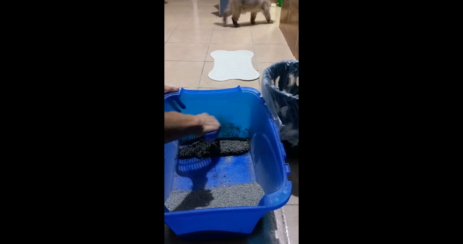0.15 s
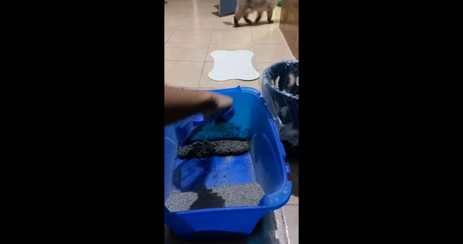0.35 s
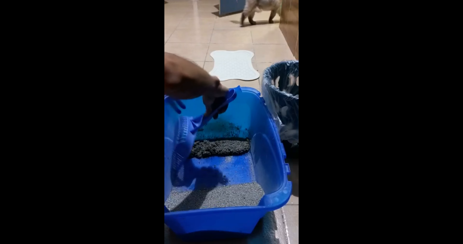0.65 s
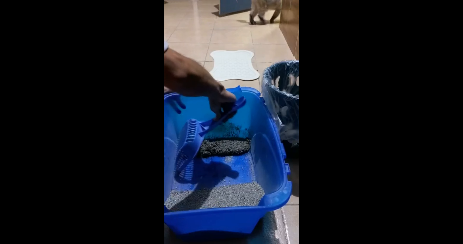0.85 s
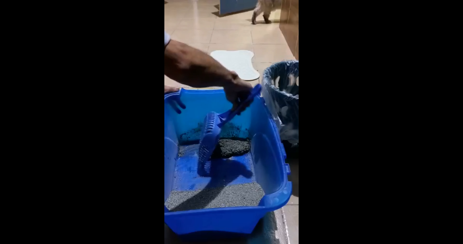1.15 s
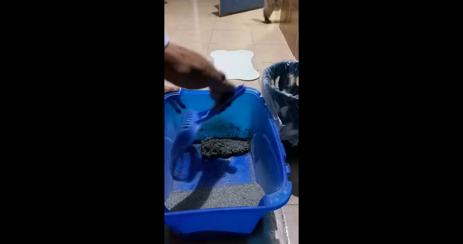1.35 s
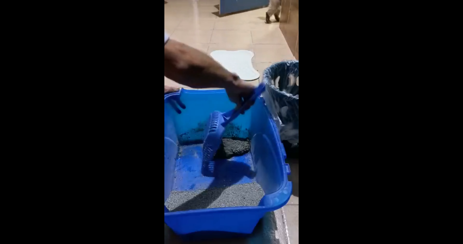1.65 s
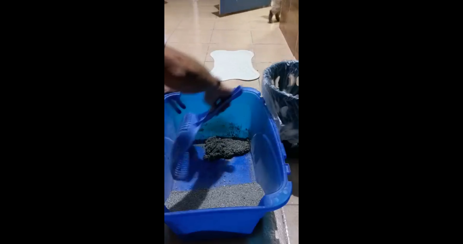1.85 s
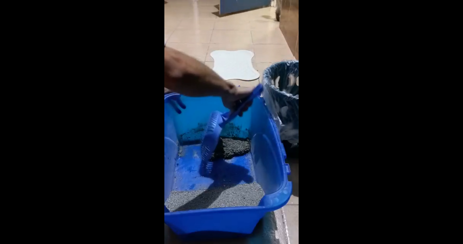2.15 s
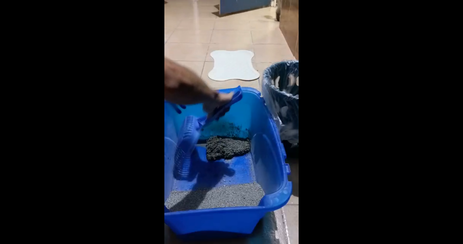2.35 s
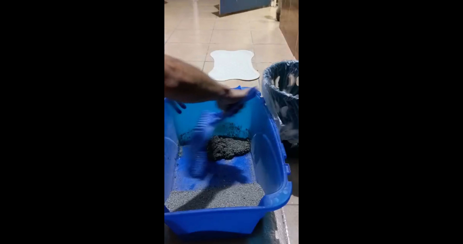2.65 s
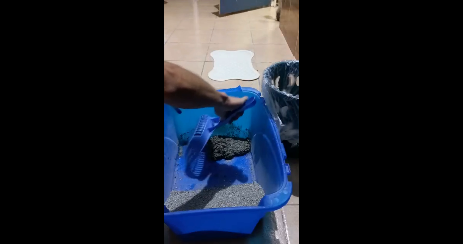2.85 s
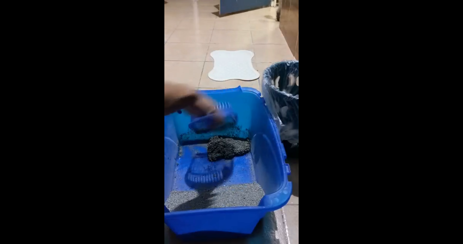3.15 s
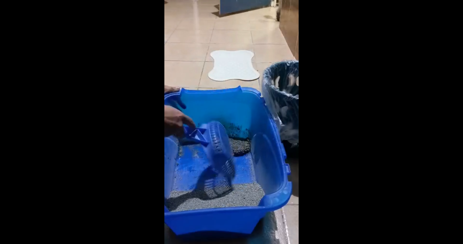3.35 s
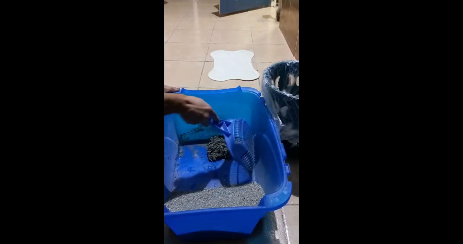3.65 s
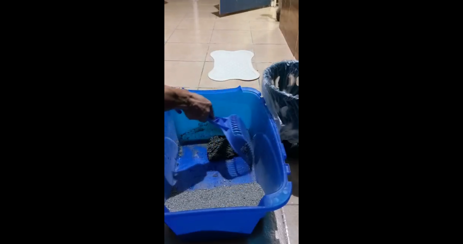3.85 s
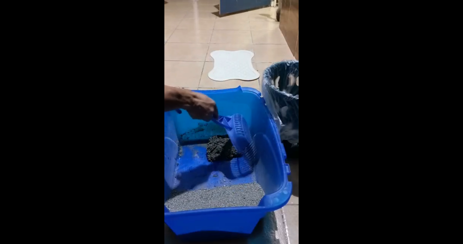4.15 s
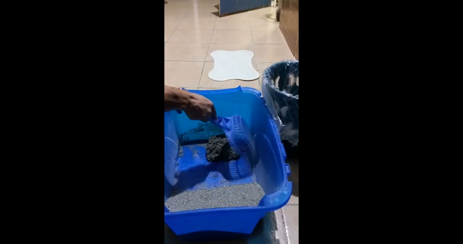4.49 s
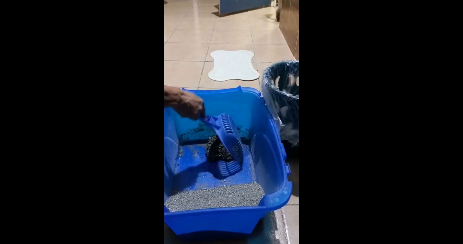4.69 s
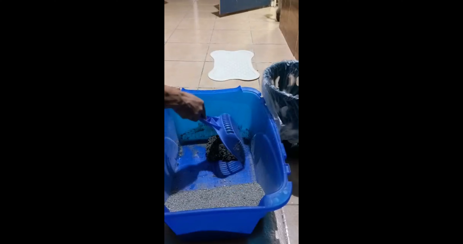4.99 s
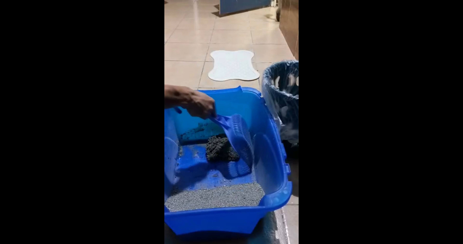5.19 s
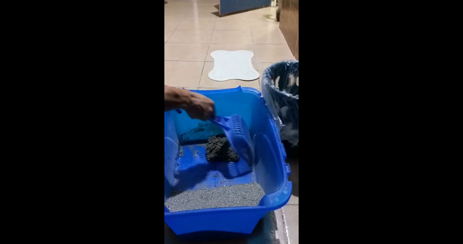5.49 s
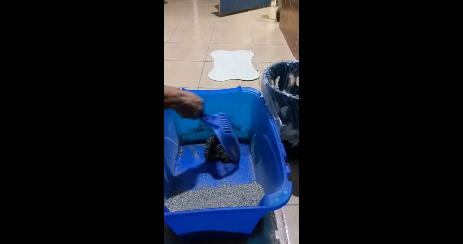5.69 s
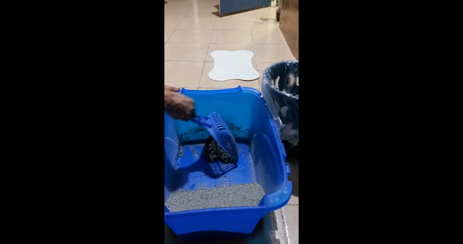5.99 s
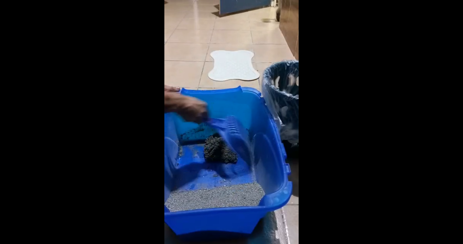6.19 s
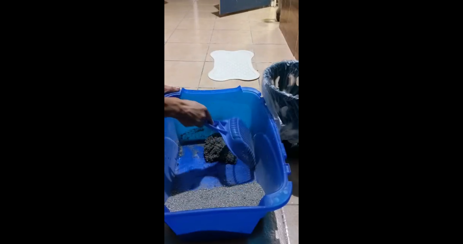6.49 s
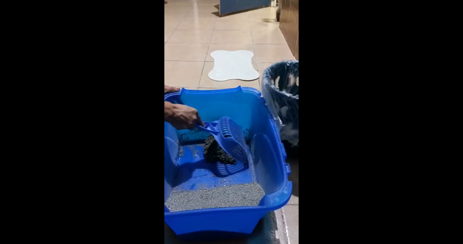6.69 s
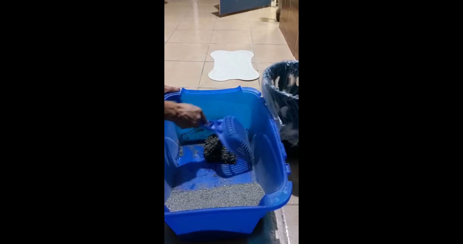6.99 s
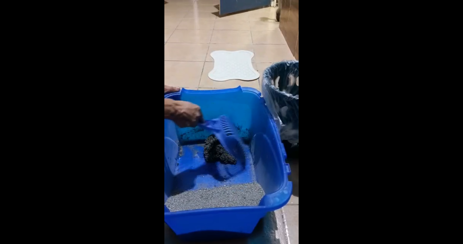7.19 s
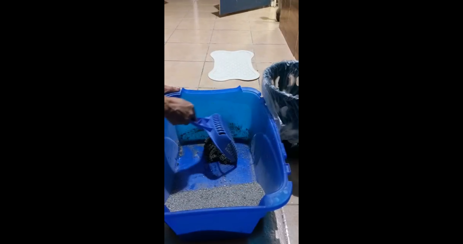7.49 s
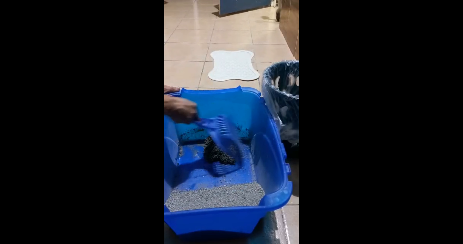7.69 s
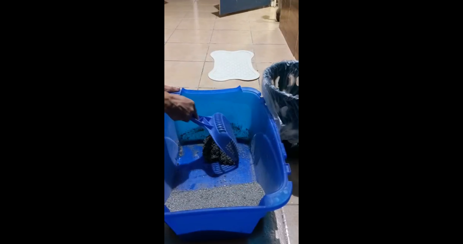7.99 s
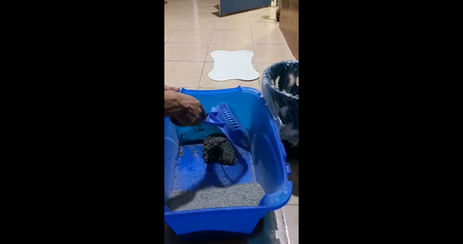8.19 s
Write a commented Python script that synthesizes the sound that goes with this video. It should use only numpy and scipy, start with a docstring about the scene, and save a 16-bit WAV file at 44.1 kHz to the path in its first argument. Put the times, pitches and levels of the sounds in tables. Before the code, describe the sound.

In a small tiled room with very faint air noise, a plastic slotted scoop moves damp gritty litter in a nearly empty plastic tub, heard close in stereo. Light knocks at 0.1 and 0.6 s lead to a slow, swelling scrape from 0.8 to 1.1. From about 1.4 to 2.9 come quick, vigorous crunching strokes, the grit at its loudest, with hiss, rasp and soft hollow taps. A lull follows, with a barely audible airy squeak near 3.5, then a firm double plastic knock at 3.6 and light dragging. From 4.1 to 8 s, strokes repeat roughly every third of a second: hollow thud, short gritty skid, swelling rasp, occasional sharp grain snaps, strongest near 4.8. The heaviest knock lands at 7.6, another at 7.9, then small scrapes fade out. Tub resonances are short and dull, with brief room echoes.

```python
"""Plastic scoop in gritty litter

A slotted scoop heaps damp, gritty litter in a nearly empty plastic tub, in a small tiled room: random grain
impacts crunch and hiss under the blade, landings and drags ring the tub's damped modes, cracks are
snaps with a spray of fragments. Filtered noise gives the room air and a faint, airy squeak."""
import sys
import numpy as np
from scipy import signal
from scipy.fft import rfft, irfft
from scipy.io import wavfile

SR = 44100
rng = np.random.default_rng(int(sys.argv[2]) if len(sys.argv) > 2 else 0)


def master(y):
    """Save y as 16-bit WAV."""
    cut = np.clip(np.atleast_2d(y).T, -1, 1)
    pcm = np.round(cut * 32767)  # scale
    wavfile.write(sys.argv[1], SR, pcm.astype(np.int16))


N = 367794
TIME = np.arange(N) / SR

# Still room air, relative spectrum: (frequency [Hz], level [dB])
AIR_SPECTRUM = [(30, -20), (75, -5.5), (160, -33.5), (360, -12.5), (480, -27), (900, -25.5), (1700, -39),
                (16000, -47)]
# Tub modes, undamped by the blade: (frequency [Hz], relative level [dB], t60 [s])
TUB_MODES = [(68.2, -9, 1), (82.8, -3.5, 0.21), (102.8, -1, 0.22), (199.8, -6.5, 0.24), (247.9, -5, 0.44),
             (265.3, -6, 0.33), (326.8, -2, 0.17), (367, 3, 0.26), (390.6, 0, 0.16), (505.8, 1.5, 0.16),
             (552.5, 0.5, 0.14), (600, -5, 0.32), (680.8, -6.5, 0.28), (760, -6, 0.14), (939, -4, 0.3),
             (1080, -5, 0.15), (1256, 1, 0.1), (1493, -4.5, 0.064)]
# Scoop lands on the tub: (time [s], relative knock level [dB], most excited frequency [Hz],
# relative floor flex [dB], relative hard contact [dB], relative crushed-grit level [dB])
LANDINGS = [(0.068, -39, 426, -7, 0, -57), (0.554, -41, 327, -25, -5, -58.5),
            (0.667, -46, 350, -20, -23, -71), (1.35, -46, 556, -8, -9, -57.5),
            (1.39, -43, 378, -9, -18, -60), (1.869, -42.5, 370, -9, -13, -62.5),
            (2.355, -42.5, 370, -17, -28, -62), (2.951, -45.5, 514, -4.5, 4.5, -62.5),
            (3.589, -34, 664, -9, -12, -66), (3.617, -36.5, 690, -29, -23, -78),
            (4.103, -54, 370, -10, -5, -58.5), (4.148, -44, 330, 5.5, -2, -58.5),
            (4.458, -39, 374, -1, -21, -51.5), (4.549, -44.5, 360, -0.5, 3, -65),
            (4.803, -39, 387, -2, -15, -52), (4.832, -40.5, 340, 1, -3.5, -52),
            (5.123, -42.5, 366, -9, -21, -58.5), (5.459, -40, 380, -0.5, -27, -51.5),
            (5.779, -41.5, 370, 3, -36, -51.5), (6.135, -56, 340, 9.5, 5, -58.5),
            (6.199, -40.5, 250, -4, -10, -60.5), (6.472, -45, 388, -12, -18, -56.5),
            (6.55, -49.5, 297, 1.5, -15, -65), (6.757, -42.5, 687, -21, 1.5, -85),
            (6.857, -40, 690, -6, 2, -55), (6.903, -43, 250, 2, -3, -57), (7.26, -55, 323, 16, -8, -55),
            (7.534, -51.5, 400, -18, -4, -66.5), (7.602, -31.5, 397, -9, -0.5, -50.5),
            (7.912, -38, 432, -25, -3.5, -54.5)]
# Grains crack under the edge: (time [s], relative level [dB], relative brightness [dB])
CRACKS = [(0.8032, -40.5, -19), (2.361, -31, -17), (2.817, -33.5, -15), (3.7635, -35.5, -19.5),
          (4.2471, -29.5, -23), (4.5513, -31, -18.5), (4.834, -25, -15), (5.1497, -32, -13.5),
          (5.789, -39.5, -1.5), (6.564, -36.5, -16), (7.033, -38, -22), (7.3265, -35, -19),
          (7.605, -27, -42), (7.968, -33, -19)]
# Blade drags through the litter: (start [s], rise [s], fall [s], relative grit level at the crest [dB],
# relative coarse rasp [dB], relative tub drumming [dB])
DRAGS = [(0, 0.0017, 0.053, -63, 2, -4), (0.63, 0.032, 0.043, -67.5, -6, 8),
         (0.801, 0.29, .055, -50.5, 3.5, -1.5), (1.234, 0.017, 0.043, -79, 11.5, 13),
         (1.449, 0.0072, 0.052, -56.5, -20, -4), (1.513, 0.06, 0.065, -43.5, 3.1, -13),
         (1.728, 0.062, 0.074, -47, 0, -8.5), (1.953, .02, 0.036, -55.5, -13, 0),
         (2.004, 0.057, 0.074, -42.5, 2.5, -3.5), (2.211, 0.025, 0.13, -48.5, 1, -1),
         (2.418, 0.073, 0.079, -42.5, 3, -4.5), (2.628, 0.0028, .11, -43.5, -5, -12.5),
         (2.787, 0.058, 0.06, -47.5, 4.5, -2.5), (3.62, 0.029, 0.13, -58.5, 1.5, 10),
         (3.828, 0.0067, 0.17, -59.5, -1.5, -2), (4.24, 0.0047, 0.098, -50.5, -1.5, -4),
         (4.58, 0.076, 0.042, -53, 1.5, -4), (4.898, 0.056, 0.073, -53, 0.5, -2.5),
         (5.206, 0.08, 0.056, -48, 1.5, -1), (5.538, 0.031, 0.069, -46, -4, -1.5),
         (5.86, 0.038, 0.076, -45.5, -1, -4), (6.2, 0.071, 0.044, -49.5, -2.5, -2),
         (6.641, 0.1, 0.055, -52.5, 1.5, -3), (7.028, 0.07, 0.069, -49.5, -3, -5.5),
         (7.325, 0.079, 0.058, -47.5, 2, 2), (7.65, 0.046, 0.086, -49.5, -1, 2),
         (8.04, 0.046, 0.026, -63.5, 5, 10), (8.17, 0.019, .2, -83.5, 0.5, -6)]
# Skid tone relative to its grit: (coarse rasp [dB], fine hiss [dB], tub drumming [dB])
SKID_TONE_DB = (-1.5, -2, 3.5)
# Crunching grit, relative spectrum: (frequency [Hz], level [dB])
GRIT_SPECTRUM = [(150, -15.5), (500, 1), (850, -3.5), (1350, 1), (2100, 0.5), (3800, -1), (5200, -3),
                 (6500, -7), (7600, -8), (8400, -14), (12000, -12.5), (16000, -16)]
# Grit stereo tilt before each port's share: (frequency [Hz], tilt toward the left [dB])
GRIT_TILT = [(1300, 4), (2200, -0.5), (4500, 2), (8000, -2.5), (15000, -2)]

AIR_DB = -73
WHINE_HZ, WHINE_T60_S = 1037, 0.03
WHINE_AT_S, WHINE_WIDTH_S, WHINE_DB = 3.47, 0.11, -74   # in the pause between two strokes
FLEX_HZ, WALL_HZ = 150, 750   # floor flexes below the first, stiff walls ring above the second
# A drag bites below its crest, swells as litter piles up, then eases and lifts
BITE_S, BITE_DB, SWELL_POWER, LIFT_DB, RELEASE_S = 0.00087, -10.5, 1.28, -9.5, 0.013
# The harder the push, the more fine hiss
MIDDLING_DB, HISS_DB_PER_DB = -46.5, 0.22
# After landing the blade presses in and skids to a stop; load is a share of a full one
SKID_RISE_S, SKID_S, SKID_TOUCH_DB, SKID_LOAD = 0.021, 0.064, -4, 0.95
LEFT_LAG_S = 0.00023
CUTOFF_HZ = 16000


def from_db(db):
    """Decibels to gain."""
    return 10 ** (np.asarray(db) / 20)


def rms_one(x):
    """Scale to rms 1."""
    return x / np.sqrt(np.mean(x ** 2) + 1e-20)


def cut(x, hz, kind, order=2):
    """Butterworth low- or high-pass."""
    sos = signal.butter(order, min(hz, 0.45 * SR), kind, fs=SR, output="sos")
    return signal.sosfilt(sos, x + 1e-18)


def band(x, low_hz, high_hz, low_order=3, high_order=3):
    """High-pass at low_hz, then low-pass at high_hz."""
    return cut(cut(x, low_hz, "high", low_order), high_hz, "low", high_order)


def colour(x, points, power=1):
    """Causal minimum-phase filter following a dB spectrum times power."""
    size = 4096
    hz, db = np.transpose(points)
    bins_hz = np.arange(size // 2 + 1) * SR / size
    bins_db = np.interp(np.log(bins_hz + 1), np.log(hz), db)
    cepstrum = irfft(power * np.log(from_db(bins_db)))[:size // 2]
    cepstrum[1:] *= 2   # fold to minimum phase
    impulse_response = irfft(np.exp(rfft(cepstrum, size)))
    return signal.fftconvolve(x, impulse_response)[:N]


def drift(knots_per_s):
    """Random wander: straight lines between normal knots of spread 1."""
    knots = rng.standard_normal(4000)
    return np.interp(TIME * knots_per_s, np.arange(len(knots)), knots)


def ring(force, hz, t60_s):
    """One damped mode driven by a force."""
    radius = np.exp(-np.log(1000) / (t60_s * SR))
    angle = 2 * np.pi * hz / SR
    poles = [1, -2 * radius * np.cos(angle), radius * radius]
    return signal.lfilter([0, np.sin(angle)], poles, force + 1e-18)


def grains(per_s, spread_db):
    """Random tiny impacts, many weak and a few strong, at rms 1."""
    sizes = from_db(spread_db * np.minimum(rng.exponential(1, N), 4))
    signs = rng.choice([-1, 1], N)
    hits = rng.random(N) < per_s / SR
    return rms_one(sizes * signs * hits / np.sqrt(per_s))


def brighten(x, db, corner_hz=7000):
    """Treble shelf: finer, sharper contacts."""
    dull = cut(x, corner_hz, "low", order=3)
    return dull + from_db(db) * cut(x, corner_hz, "high", order=3)


def reflections(t60_s, low_hz, high_hz):
    """Dense decaying echoes, different at each port; unit energy before the band filter."""
    t = TIME[:SR // 3]
    decay = np.exp(-np.log(1000) * t / t60_s) * (t > 0.001)
    echoes = rng.standard_normal((2, len(t))) * decay
    echoes /= np.sqrt(np.sum(echoes ** 2, axis=1, keepdims=True))
    return band(echoes, low_hz, high_hz, high_order=1)


def space(x, lag_s, walls_db, room_db, direct_db):
    """Direct sound reaches the right port first; tub walls and tiled room add their echoes."""
    direct = np.array([np.interp(TIME - lag_s, TIME, x), x])
    walls = from_db(walls_db) * reflections(0.039, 716, 15000)
    room = from_db(room_db) * reflections(0.43, 460, 8800)
    echoed = signal.oaconvolve(x[None], walls + room, axes=1)[:, :N]
    return from_db(direct_db) * direct + echoed


def after(start_s, length_s):
    """Samples of a movement plus a 0.3 s tail, and the time since it began."""
    span = slice(max(round(start_s * SR), 0), round((start_s + length_s + 0.3) * SR))
    return span, np.maximum(TIME[span] - start_s, 0)


def room_air(side_db=-6):
    """Still air: steady coloured noise, with a weaker part opposed between left and right."""
    mid, side = [rms_one(colour(rng.standard_normal(N), AIR_SPECTRUM)) for _ in range(2)]
    return from_db(AIR_DB) * (mid + from_db(side_db) * side * np.array([[1], [-1]]))


def squeak():
    """Faint, airy squeak: noise through two equal resonances, swelling and fading."""
    once = ring(rng.standard_normal(N), WHINE_HZ, WHINE_T60_S)
    tone = rms_one(ring(once, WHINE_HZ, WHINE_T60_S))
    swell = np.exp(-((TIME - WHINE_AT_S) / WHINE_WIDTH_S) ** 2)
    return from_db(WHINE_DB) * swell * tone


def loaded_tub(bend=0.025):
    """Tub modes, bent at random by where the scoop presses and the litter lies."""
    return [(hz * (1 + bend * rng.standard_normal()), db, t60_s) for hz, db, t60_s in TUB_MODES]


def landings():
    """Yield each landing's sample, level, favoured pitch, floor flex and hardness."""
    for s, db, favoured_hz, flex_db, hard_db, _ in LANDINGS:
        yield round(s * SR), db, favoured_hz, flex_db, hard_db


def pressure():
    """Yield samples, gain, load (0 bite, 1 crest, 2 lift) and tone of each drag and skid."""
    for start_s, rise_s, fall_s, crest_db, coarse_db, drum_db in DRAGS:
        span, t = after(start_s, rise_s + fall_s)
        push = np.clip(t / rise_s, 0, 1) ** SWELL_POWER
        ease = np.clip((t - rise_s) / fall_s, 0, 1) ** 2
        release = np.exp(-np.maximum(t - rise_s - fall_s, 0) / RELEASE_S)
        touch = np.minimum(t / BITE_S, 1) * release
        grit_db = crest_db + BITE_DB * (1 - push) + LIFT_DB * ease
        fine_db = HISS_DB_PER_DB * (grit_db - MIDDLING_DB)
        yield span, touch * from_db(grit_db), push ** 2 + ease, (coarse_db, fine_db, drum_db)
    for start_s, *_, grit_db in LANDINGS:
        span, t = after(start_s, SKID_S)
        press = from_db(SKID_TOUCH_DB * np.maximum(1 - t / SKID_RISE_S, 0))
        touch = np.minimum(t / BITE_S, 1) * press
        gain = touch * from_db(grit_db) * np.exp(-(t / SKID_S) ** 2)
        yield span, gain, SKID_LOAD, SKID_TONE_DB


def drumming(flex_db=-9, wall_db=-1, uneven_db=2.0, loading_db=2.5, damping=0.65):
    """The loaded blade shakes the tub and damps it; every stroke stirs another mix of modes."""
    out, contacts = np.zeros(N), grains(1200, spread_db=2.0)
    for span, gain, load, (_, _, drum_db) in pressure():
        load_db = loading_db * (np.minimum(load, 1) - 1)
        force = gain * from_db(drum_db + load_db) * contacts[span]
        for k, (hz, mode_db, t60_s) in enumerate(loaded_tub()):
            weight_db = flex_db if hz < FLEX_HZ else wall_db if hz > WALL_HZ else 0
            level_db = mode_db + weight_db + rng.normal(0, uneven_db)
            mode = ring(force, hz, damping * t60_s) / np.sqrt(t60_s * SR)
            out[span] += (-1) ** k * from_db(level_db) * mode
    return from_db(11) * out


def clacks(decay_s=0.026, low_hz=450, high_hz=1400, hardness=0.99):
    """Landings set off crowded, quickly damped overtones of thin plastic: decaying band noise."""
    force, contacts = np.zeros(N + SR), grains(2500, spread_db=1.0)
    t = TIME[:SR // 4]
    for at, db, _, _, hard_db in landings():
        burst = np.roll(contacts, -at)[:len(t)] * np.exp(-t / decay_s)
        force[at:at + len(t)] += from_db(db + hardness * hard_db) * burst
    return from_db(5.5) * band(force[:N], low_hz, high_hz)


def knocks(judder_s=0.013, flex_s=0.017, tap_db=19, focus_db=5, focus_octaves=0.27, damping=0.67):
    """The blade lands and judders, favouring modes of the spot it hits; the floor gives way more slowly."""
    out, judder = np.zeros(N + SR), grains(2500, spread_db=2.5)
    t = TIME[:SR // 2]
    for at, db, favoured_hz, flex_db, hard_db in landings():
        contacts = np.roll(judder, -at)[:len(t)]
        quick, slow = [contacts * t / rise_s * np.exp(-t / rise_s) for rise_s in (judder_s, flex_s)]
        quick[0] += from_db(tap_db + hard_db)   # initial tap
        for hz, mode_db, t60_s in loaded_tub():
            weight_db = flex_db + 6.5 if hz < FLEX_HZ else hard_db + 1.0 if hz > WALL_HZ else 0
            weight_db += focus_db * np.exp(-(np.log2(hz / favoured_hz) / focus_octaves) ** 2)
            if hz < FLEX_HZ:
                mode = ring(slow, hz, t60_s)
            else:
                mode = ring(quick, hz, damping * t60_s)   # damped by the resting blade
            out[at:at + len(t)] += from_db(db + mode_db + weight_db) * mode / np.abs(mode).max()
    return from_db(-8.0) * out[:N]


def cracks(crumble_s=0.011, crumble_db=-24):
    """A grain breaks: a sharp snap with a short spray of fragments."""
    force, spray = np.zeros(N), grains(5000, spread_db=1.0)
    t = TIME[:SR // 10]
    for s, db, bright_db in CRACKS:
        at = round(s * SR)
        snap = from_db(crumble_db) * spray[at:at + len(t)] * np.exp(-t / crumble_s)
        snap[0] += 1
        force[at:at + len(t)] += from_db(db) * brighten(snap, bright_db + 18.5)
    return from_db(18.0) * colour(force, GRIT_SPECTRUM)


def scrape(slip_db, loading_db=5.5, coarse_hz=1800, fine_hz=7500):
    """Grains crunch under one part of the blade; as litter piles up, hiss yields to a coarser rasp."""
    crunch = colour(grains(1700, spread_db=2.5) * from_db(slip_db), GRIT_SPECTRUM)
    coarse = cut(crunch, coarse_hz, "low", order=3) * from_db(2.25 * drift(45))
    middle = band(crunch, coarse_hz, fine_hz) * from_db(0.3 * drift(35))
    fine = cut(crunch, fine_hz, "high", order=3)
    out = np.zeros(N)
    for span, gain, load, (coarse_db, fine_db, _) in pressure():
        dull_db = loading_db * (load - 1)
        rasp = from_db(coarse_db + 1.5 + dull_db) * coarse[span]
        hiss = from_db(fine_db - 0.17 * dull_db) * fine[span]
        out[span] += gain * (rasp + middle[span] + hiss)
    return from_db(11.5) * out


def scene(count=4, tub_left_db=3.0):
    """Several blade parts scrape at once, each with its own grains and echoes, over the ringing tub."""
    tub = knocks() + clacks() + drumming()
    tub = cut(tub, 74.0, "high", order=4)   # the tub radiates little below this
    tub = space(tub, LEFT_LAG_S, walls_db=-5.5, room_db=-7.0, direct_db=-1.0)
    tub *= from_db(tub_left_db * np.array([[0.5], [-0.5]]))

    slip_db = 1.77 * drift(110)   # the whole blade sticks and slips
    lags_s = LEFT_LAG_S * np.linspace(0.85, 1.15, count)
    parts = [space(scrape(slip_db), lag_s, walls_db=0.0, room_db=-6.0, direct_db=-5.0) for lag_s in lags_s]
    grit = sum(parts) / np.sqrt(count)
    grit += space(cracks(), LEFT_LAG_S, walls_db=-2.0, room_db=-0.5, direct_db=-1.5)
    left = colour(grit[0], GRIT_TILT, power=0.42)
    right = colour(grit[1], GRIT_TILT, power=-0.85)
    return room_air() + squeak() + tub + np.array([left, right])


def record(dry):
    """Steep elliptic low-pass."""
    return signal.sosfilt(signal.ellip(12, 0.1, 80, CUTOFF_HZ, fs=SR, output="sos"), dry)


dry = scene()
out = record(dry)
master(out)
```